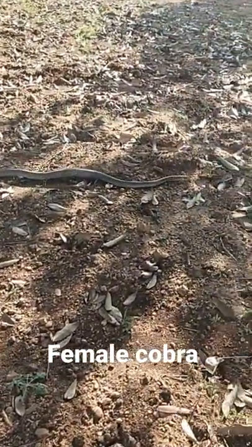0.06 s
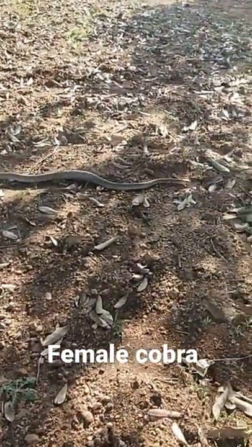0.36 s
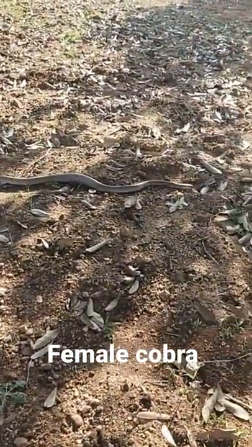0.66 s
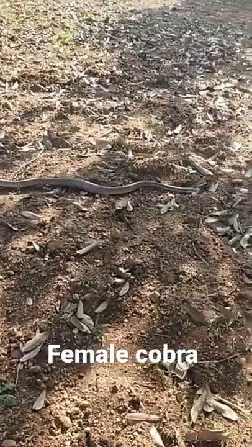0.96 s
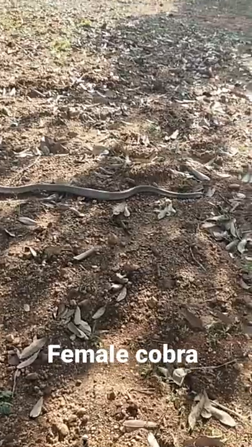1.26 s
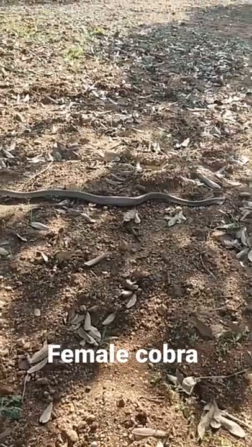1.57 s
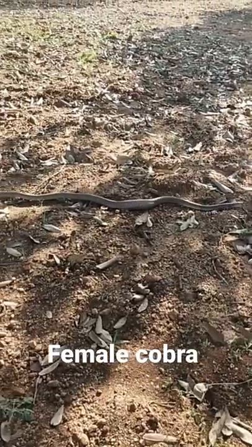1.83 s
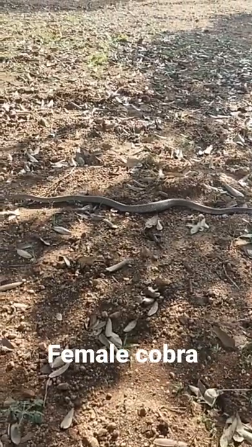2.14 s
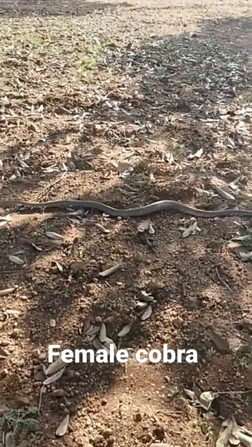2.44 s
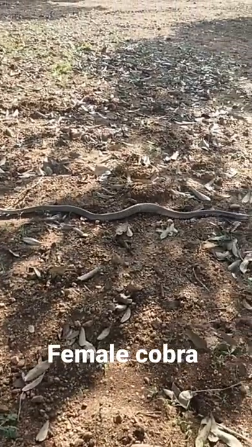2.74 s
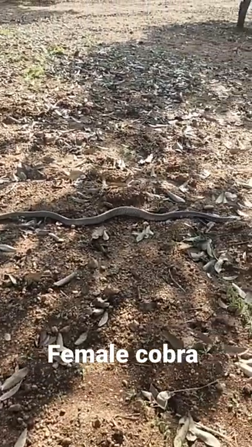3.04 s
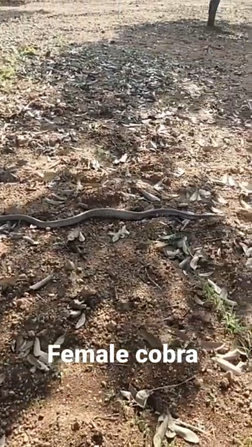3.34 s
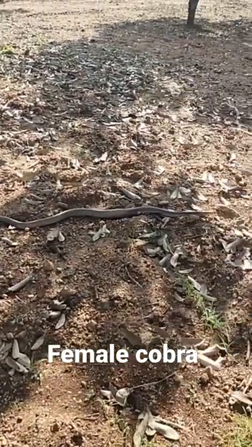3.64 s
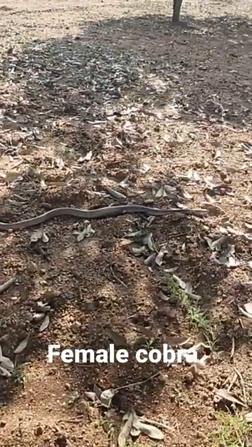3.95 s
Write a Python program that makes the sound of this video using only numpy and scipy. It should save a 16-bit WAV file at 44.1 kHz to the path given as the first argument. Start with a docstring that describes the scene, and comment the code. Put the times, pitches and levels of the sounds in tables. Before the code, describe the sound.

A breeze buffets the microphone, with faint dry leaf crackles and two distant bird chirps.

```python
"""A snake in the breeze

A light, rising breeze buffets the two ports (openings) of an outdoor microphone, mostly the right
one: swirls of air press on them and make a rumble with dull thumps. A snake slides over dry soil
and leaf litter, crunching tiny grains, and dry leaves crackle, mostly on the left.
A distant bird chirps twice over faint far-off calls and a quiet open-air hiss."""
import sys
import numpy as np
from scipy import signal
from scipy.fft import rfft, irfft
from scipy.io import wavfile
from scipy.ndimage import uniform_filter1d

SR = 44100
rng = np.random.default_rng(int(sys.argv[2]) if len(sys.argv) > 2 else 0)


def bounce(signal):
    """Save signal as a 16-bit WAV file at the path given by the first command-line argument."""
    frames = np.transpose(np.atleast_2d(signal))
    limited = np.clip(frames, -1, 1)
    pcm = np.round(limited * 32767).astype(np.int16)
    wavfile.write(sys.argv[1], SR, pcm)


N = 176400  # 4 seconds
TIME = np.arange(N) / SR

# tone of a thump of air on a port: multiple of its centre frequency, level/dB
THUMP_SPECTRUM = [(.12, -22), (.3, -36), (.5, -5.5), (.8, 4.5), (1.2, 0.5), (1.8, -8.5), (2.8, -27),
                  (4.6, -48), (9, -65.5)]


def amp(db):
    """Turns decibels into a factor to multiply a sound by."""
    return 10 ** (np.asarray(db) / 20)


def unit(x):
    """Scales a signal so that its average size (rms) is 1."""
    return x / np.sqrt(np.mean(x ** 2) + 1e-30)


def curve(points):
    """Joins (time, value) points with straight lines, giving a value for every sample."""
    return np.interp(TIME, *np.transpose(points))


def colour(x, points, scale=1):
    """Shapes a sound's tone by (f/Hz, level/dB) points, their frequencies multiplied by scale."""
    f, db = np.transpose(points)
    hz = np.fft.rfftfreq(x.shape[-1], 1 / SR)
    gain = amp(np.interp(np.log(hz + 1), np.log(f * scale), db))
    return irfft(rfft(x) * gain, x.shape[-1])


def wander(rate_hz, size=N):
    """A smooth random wobble of average size 1, up to about the given rate."""
    hz = np.fft.rfftfreq(size, 1 / SR)
    return unit(irfft(rfft(rng.standard_normal(size)) / (1 + (hz / rate_hz) ** 4), size))


def pan(x, lean_db):
    """Leans a sound to the left (+) or right (-)."""
    return x * amp([[lean_db / 2], [-lean_db / 2]])


def add(mix, start_s, sound):
    """Adds a sound to the mix at a given time, dropping whatever falls outside it."""
    at = round(start_s * SR)
    part = mix[..., max(at, 0):max(at + sound.shape[-1], 0)]
    part += sound[..., max(-at, 0):][..., :part.shape[-1]]


def faint_bands(rows, lean_db):
    """Soft noises that swell and fade, each in its own band of frequencies."""
    out, hz = np.zeros((2, N)), np.fft.rfftfreq(N, 1 / SR)
    for start, length, db, centre_hz, width_hz in rows:
        rolloff = 1 + ((hz - centre_hz) / width_hz) ** 4
        band = unit(irfft(rfft(rng.standard_normal((2, N))) / rolloff, N))
        progress = np.clip((TIME - start) / length, 0, 1)
        out += amp(db) * band * np.sqrt(abs(np.sin(np.pi * progress)))
    return pan(out, lean_db)


def air():
    """The even hiss of the open surroundings, a little of it shared by both ports."""
    # tone of the hiss: f/Hz, level/dB
    spectrum = [(30, 8.5), (300, 11.5), (600, 3.5), (1000, 0.5), (2000, -1), (2600, 0), (3300, -4.5),
                (4400, -5), (5600, -7.5), (6700, -7.5), (8000, -14.5), (10500, -15), (13500, -19.5),
                (15500, -25)]
    # how far it leans left: f/Hz, left minus right/dB
    lean = [(100, -6.5), (1300, 2.5), (2400, 6), (4400, 1), (15000, 3.5)]
    # its loudness: t/s, level/dB
    levels = [(0, -61.5), (.9, -61), (2.6, -63), (3.4, -59), (4, -60)]
    shared = 0.077  # part of the power that both sides have in common
    common = np.sqrt(shared) * rng.standard_normal(N)
    separate = np.sqrt(1 - shared) * rng.standard_normal((2, N))
    hiss = unit(colour(common + separate, spectrum))
    left = colour(hiss[0], [(f, db / 2) for f, db in lean])
    right = colour(hiss[1], [(f, -db / 2) for f, db in lean])
    return np.array([left, right]) * amp(curve(levels) + 1.6 * wander(rate_hz=33))


def far_calls():
    """Faint far-off calls, blurred into narrow bands of noise."""
    # the calls: start/s, length/s, level/dB, centre/Hz, width/Hz
    calls = [(-.1, 0.4, -70.5, 1085, 140), (-.05, 0.29, -73.5, 4760, 350), (.68, 0.8, -71, 1710, 85),
             (3.38, 0.62, -73.5, 4360, 354)]
    return faint_bands(calls, lean_db=6.5)


def chirp(length, level_db, pitch_hz):
    """The two parts of a chirp: a falling rasp of wobbling tones, and a clean closing note."""
    # tones in the rasp: multiple of the pitch, level/dB
    tones = [(1.17, -6.5), (1.03, -0.5), (.92, -2.5)]
    wobble_hz, note_db = 103, 11
    fall = 0.0607  # share of the pitch lost by the end
    note_at, note_width = 0.9, 0.14  # shares of the chirp's length
    progress = np.arange(0, 1, 1 / (length * SR))
    rasp = 0
    for ratio, db in tones:
        hz = pitch_hz * ratio * (1 - fall * progress)
        hz += wobble_hz * wander(rate_hz=520, size=len(progress))
        rasp = rasp + amp(db) * np.sin(2 * np.pi * np.cumsum(hz) / SR)
    rasp *= np.sqrt(np.sin(np.pi * progress))
    swell = np.exp(-((progress - note_at) / note_width) ** 2)
    fade_out = np.minimum(1, 20 * (1 - progress))
    note = amp(note_db) * swell * fade_out * np.sin(2 * np.pi * pitch_hz * length * progress)
    return amp(level_db) * np.array([rasp, note])


def bird():
    """A distant bird chirps twice, and the sound scatters among the trees."""
    # the chirps: start/s, length/s, level/dB, pitch/Hz
    chirps = [(1.3, 0.0693, -57.5, 2410), (3.64, .07, -57, 2457)]
    echo_db, note_echo_db = 1, -6
    echo_s = 0.66  # time to die away by 60 dB
    parts, t = np.zeros((2, N)), np.arange(SR) / SR
    for start, *call in chirps:
        add(parts, start, chirp(*call))
    rasp, note = parts
    tail = rng.standard_normal((2, SR)) * amp(-60 * t / echo_s)
    tail /= np.linalg.norm(tail[0])
    scattered = rasp + amp(note_echo_db) * note
    echo = signal.fftconvolve(scattered[None], tail, axes=1)[:, :N]
    return pan(rasp + note + amp(echo_db) * echo, lean_db=6)


def snap_bodies_and_scuff():
    """The duller mid-range body of two leaf snaps, and a soft scuffing between them."""
    # first snap, scuffing, second snap: start/s, length/s, level/dB, centre/Hz, width/Hz
    bands = [(.428, 0.029, -63, 1940, 704), (.56, 0.34, -68.5, 2300, 806), (.818, 0.014, -54, 2550, 1420)]
    return faint_bands(bands, lean_db=6)


def litter_rustle():
    """Tiny grains of soil and leaf crunch under the snake, each making one click."""
    # tone of the crunching soil: f/Hz, level/dB
    spectrum = [(500, -8), (2500, 2), (5400, -7.5), (6700, 4.5), (7800, -5), (10800, -9.5), (13500, -2),
                (16000, -10.5)]
    # loudness of the rustle: t/s, level/dB
    levels = [(0, -75), (.5, -76), (.6, -70), (.79, -67.5), (.83, -56), (.89, -61.5), (.93, -60.5),
              (.98, -64.5), (1.04, -64.5), (1.4, -69), (1.75, -68), (2.5, -70.5), (3.1, -70), (3.77, -68),
              (3.82, -63), (4, -71)]
    grains_per_s, spread_db = 6000, 1.5
    sizes = amp(spread_db * np.minimum(rng.exponential(1, N), 5))
    hits = rng.random(N) < grains_per_s / SR
    grains = unit(colour(sizes * hits * rng.standard_normal((2, N)), spectrum))
    return pan(grains * amp(curve(levels)), lean_db=5)


def leaf_snaps():
    """Dry leaves give way: a sharp crack, then a crinkle of crumbs."""
    # the snaps: t/s, peak/dB, left minus right/dB
    snaps = [(.432, -47.5, 9), (0.573, -49, 7), (0.822, -44, 22), (0.826, -41, 20), (.853, -37, 14.5),
             (0.908, -44, 10), (.920, -33.5, 21), (0.9272, -37.5, 14), (1.014, -34.5, 9.5),
             (1.039, -45, 14), (1.046, -44, 3), (1.514, -46, 10), (1.582, -54, 7), (1.722, -48, 4),
             (3.794, -45, -4)]
    # tone of a breaking leaf: f/Hz, level/dB
    spectrum = [(300, -16), (2300, -14), (4000, -5), (5400, -7), (6200, -1), (6700, 10.5), (7400, -2),
                (9000, -3.5), (10800, -8.5), (13800, 1.5), (16000, -15.5)]
    crack_s, crinkle_s, crinkle_db, crumbs_per_s = 0.00042, 0.014, -18.5, 1600
    out, t = np.zeros((2, N)), np.arange(-256, 3840) / SR
    for start, peak_db, lean_db in snaps:
        hits = rng.random(len(t)) < crumbs_per_s / SR
        crumbs = unit(uniform_filter1d(hits.astype(float), size=12))
        crack = np.exp(-abs(t) / crack_s)
        crinkle = amp(crinkle_db) * crumbs * np.exp(-abs(t) / crinkle_s)
        burst = rng.standard_normal((2, len(t))) * (t >= 0) * (crack + crinkle)
        tilt_db = -0.5 * rng.uniform(-0.8, 1)  # per octave: each leaf is a bit brighter or duller
        snap = colour(burst, [(f, db + tilt_db * np.log2(f)) for f, db in spectrum])
        snap /= abs(snap).max(1, keepdims=True)
        add(out, start + t[0], pan(amp(peak_db) * snap, lean_db))
    return out


def turbulence(spectrum):
    """The low rumble of swirling air, with its slow changes in loudness evened out."""
    rumble = colour(rng.standard_normal(N), spectrum)
    power = uniform_filter1d(uniform_filter1d(rumble ** 2, size=1800), size=1800)
    return rumble / np.sqrt(abs(power) + 1e-20)


def puff(length, level_db, centre_hz):
    """A ragged burst of air pressure, heard as a dull thump."""
    t = (np.arange(8192) - 4096) / SR
    swell = np.exp(-2 * (t / length) ** 2)
    thump = colour(swell * rng.standard_normal(len(t)), THUMP_SPECTRUM, centre_hz)
    power = (thump ** 2).sum() / (SR * (length + 0.0035))
    return amp(level_db) * thump / np.sqrt(power)


def slap(peak_db, centre_hz):
    """One tight swirl of air hits the port head-on: a single pulse of pressure."""
    pulse = colour(signal.unit_impulse(8192, "mid"), THUMP_SPECTRUM, centre_hz)
    return amp(peak_db) * pulse / pulse.max()


def wind_at_port(levels, puffs, slaps, calm_db, gust_db):
    """Wind buffets one port: a rumble that brightens and flutters as it grows, plus thumps."""
    # tone of the rumble in calm air and in a gust: f/Hz, level/dB
    calm_spectrum = [(43, -29), (65, -6.5), (100, 4.5), (170, -1), (260, -13.5), (390, -38.5), (520, -62),
                     (800, -57), (1500, -92)]
    gust_spectrum = [(43, -21.5), (65, -21.5), (105, 2), (170, 5), (260, 5.5), (390, -5.5), (580, -24),
                     (730, -31.5), (1500, -62.5)]
    lump_db, flutter_db, top_hz = 1.52, 4, 820
    level_db = curve(levels) + lump_db * wander(rate_hz=23.6)
    gust_share = np.clip((level_db - calm_db) / (gust_db - calm_db), 0, 1) ** 3
    flutter = unit(amp(flutter_db * wander(rate_hz=54)))
    calm = np.sqrt(1 - gust_share) * turbulence(calm_spectrum)
    gust = np.sqrt(gust_share) * flutter * turbulence(gust_spectrum)
    out = amp(level_db) * (calm + gust)
    for strike, rows in ((puff, puffs), (slap, slaps)):
        for middle_s, *settings in rows:
            thump = strike(*settings)
            add(out, middle_s - len(thump) / SR / 2, thump)
    keep_lows = signal.butter(4, top_hz, fs=SR, output="sos")
    return signal.sosfiltfilt(keep_lows, out)


def breeze():
    """The rising breeze strikes each port separately, the right one harder."""
    # loudness of the buffeting: t/s, level/dB
    levels_left = [(0, -57), (.15, -42), (.27, -58), (.33, -40.5), (.5, -46), (.58, -42), (.76, -43.5),
                   (.94, -36.5), (1.3, -39), (1.52, -46.5), (1.65, -35), (1.76, -51), (2.05, -62),
                   (2.15, -44.5), (2.44, -50), (2.56, -37), (2.64, -46), (2.72, -35.5), (2.88, -40.5),
                   (3.08, -37.5), (3.2, -30), (3.4, -49), (3.47, -38), (3.647, -26), (3.76, -35.5),
                   (3.901, -25.5), (4, -50.5)]
    levels_right = [(0, -26.5), (.1, -43.5), (.27, -52.5), (.34, -40.5), (.56, -30.5), (.67, -35.5),
                    (.75, -41), (1.05, -32.5), (1.36, -39), (1.65, -34.5), (1.9, -43.5), (2.1, -35),
                    (2.35, -29.5), (2.58, -26.5), (2.638, -35.5), (2.697, -26), (2.86, -29), (3.08, -27.5),
                    (3.221, -24), (3.37, -30.5), (3.539, -26), (3.65, -25), (3.74, -25.5), (3.9, -25),
                    (4, -30.5)]
    # ragged puffs of air: t/s, length/s, level/dB, centre/Hz
    puffs_left = [(0.56, 0.04, -28.5, 146), (0.894, 0.015, -27, 128), (1.049, 0.024, -29, 133),
                  (1.371, 0.0073, -28, 241), (1.826, 0.011, -29.5, 117), (2.739, 0.021, -28, 140),
                  (3.802, 0.012, -27.5, 204), (3.86, 0.024, -37, 117)]
    puffs_right = [(0.008, 0.011, -32, 117), (0.409, 0.018, -28, 108), (0.545, 0.033, -24.5, 136),
                   (0.68, 0.02, -24.5, 139), (1.593, 0.0074, -24, 151), (1.675, 0.049, -38, 210),
                   (2.151, 0.021, -23.5, 153), (2.283, 0.017, -23, 182), (2.71, 0.042, -26.5, 158),
                   (3.019, 0.049, -26, 175), (3.113, 0.02, -18.5, 180), (3.215, 0.034, -23, 230),
                   (3.687, 0.025, -20, 193), (3.949, 0.013, -17.5, 230)]
    # tight swirls that slap the port: t/s, peak/dB, centre/Hz
    slaps_left = [(0.639, -19.5, 159), (.834, -17, 137), (1.369, -26.5, 330), (2.522, -18, 142),
                  (2.7317, -20, 157), (3.035, -16, 197), (3.076, -11, 156), (3.192, -15, 204),
                  (3.666, -22, 324), (3.9011, -14.5, 312)]
    slaps_right = [(.052, -13.5, 124), (0.5405, -14.5, 151), (0.694, -14.5, 178), (0.91, -14, 132),
                   (1.01, -18, 141), (1.59, -12.5, 168), (2.448, -14, 155), (2.512, -14, 141),
                   (2.721, -19, 195), (2.937, -13, 177), (3.058, -16.5, 244), (3.109, -17, 238),
                   (3.193, -17, 284), (3.217, -25, 254), (3.251, -10, 192), (3.472, -17.5, 287),
                   (3.503, -15.5, 244), (3.632, -11, 241), (3.772, -12.5, 250), (3.787, -16, 200),
                   (3.812, -15, 276), (3.914, -7.5, 250)]
    # levels where the rumble starts to brighten (calm) and is brightest (gust): left/dB, right/dB
    calm_db = [-43, -32.5]
    gust_db = [-29, -20]
    left = wind_at_port(levels_left, puffs_left, slaps_left, calm_db[0], gust_db[0])
    right = wind_at_port(levels_right, puffs_right, slaps_right, calm_db[1], gust_db[1])
    return np.array([left, right])


def scene():
    """The breeze and the snake over the quiet surroundings."""
    wind = breeze()
    ground = litter_rustle() + leaf_snaps() + snap_bodies_and_scuff()
    return wind + ground + air() + bird() + far_calls()


def record(dry):
    """The recorder cuts off the very highest treble."""
    top_hz = 15900
    cut_treble = signal.firwin(511, top_hz, window=("kaiser", 9), fs=SR)
    return signal.oaconvolve(dry, cut_treble[None], "same")


dry = scene()
out = record(dry)
bounce(out)
```